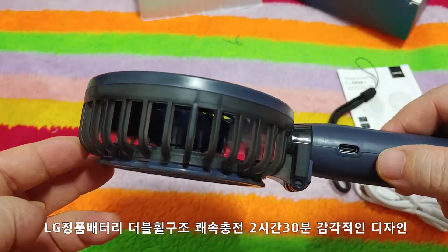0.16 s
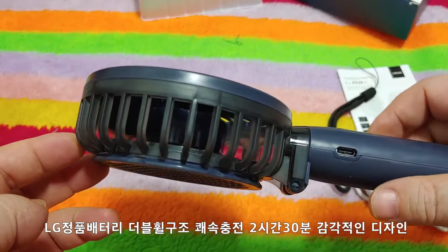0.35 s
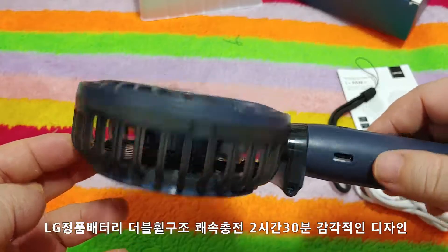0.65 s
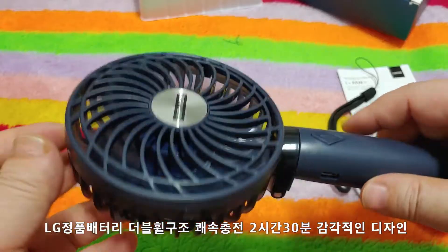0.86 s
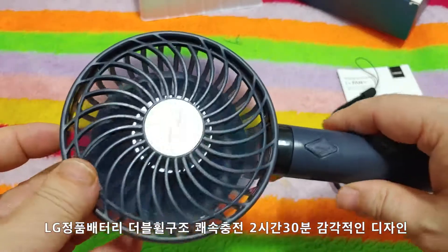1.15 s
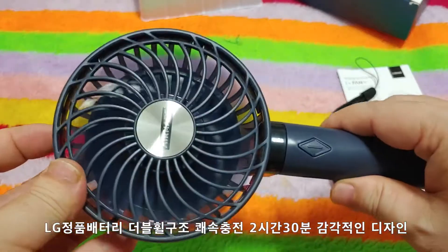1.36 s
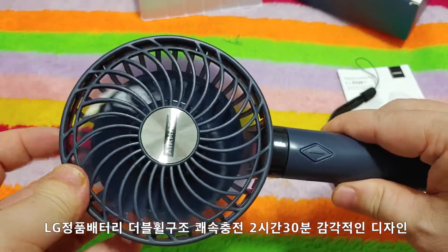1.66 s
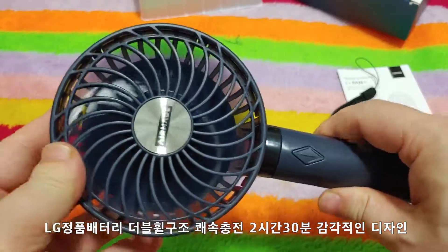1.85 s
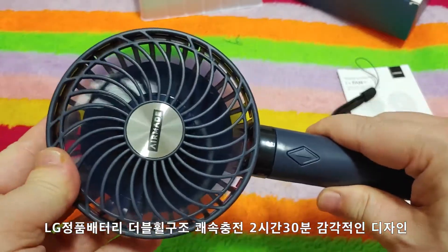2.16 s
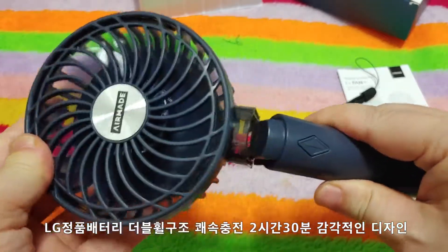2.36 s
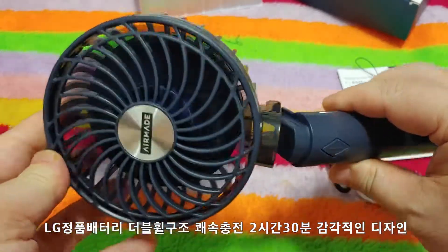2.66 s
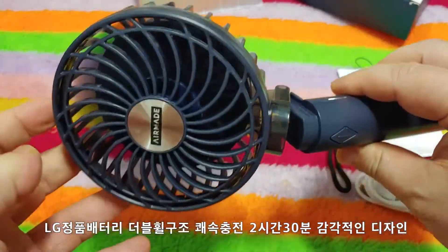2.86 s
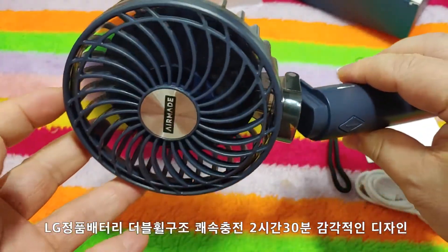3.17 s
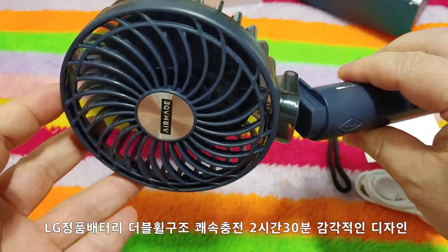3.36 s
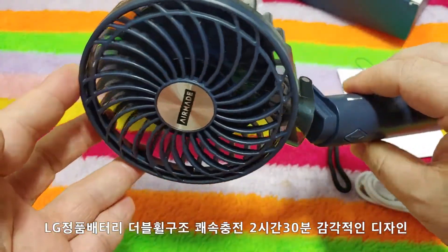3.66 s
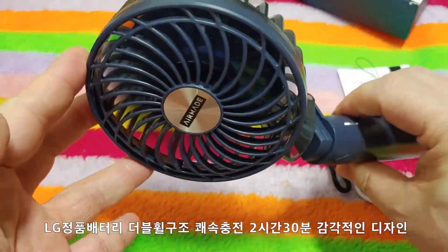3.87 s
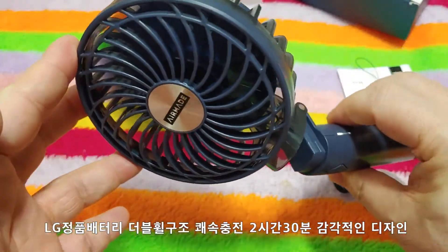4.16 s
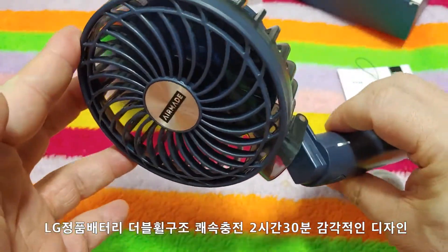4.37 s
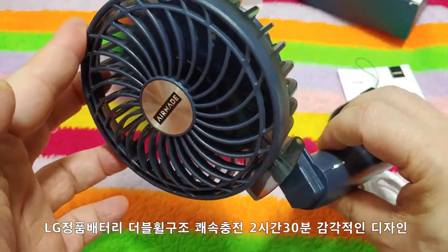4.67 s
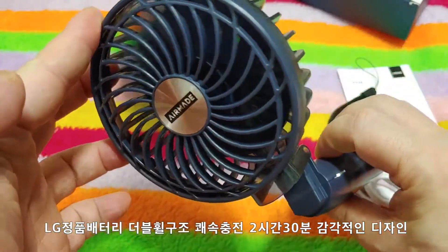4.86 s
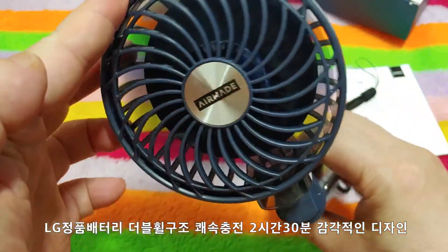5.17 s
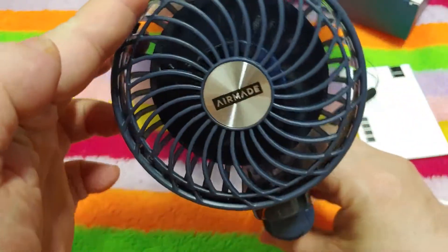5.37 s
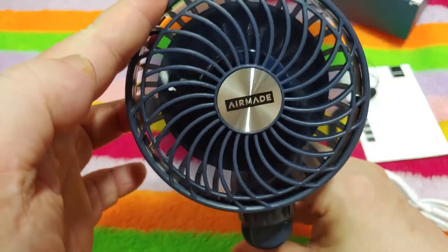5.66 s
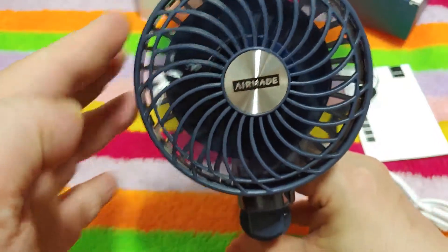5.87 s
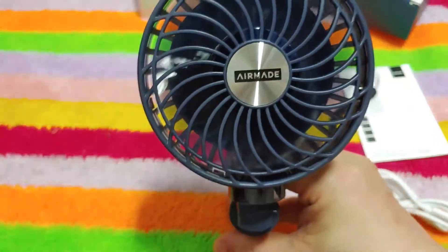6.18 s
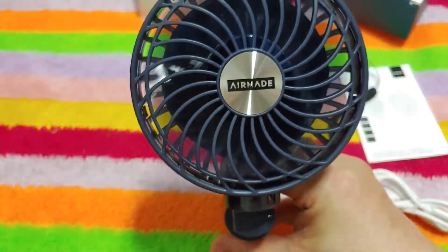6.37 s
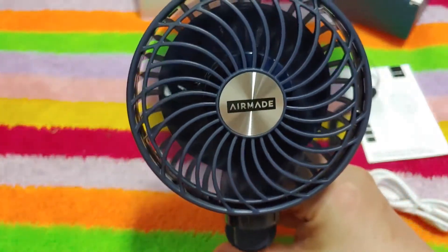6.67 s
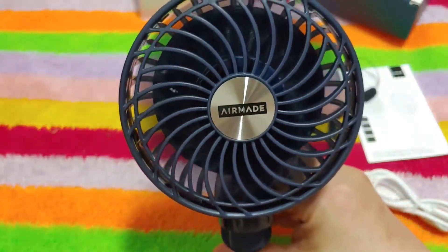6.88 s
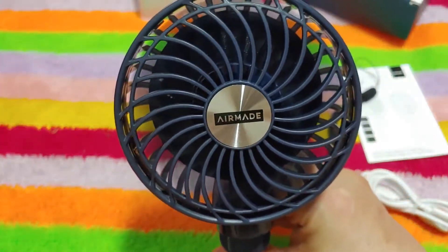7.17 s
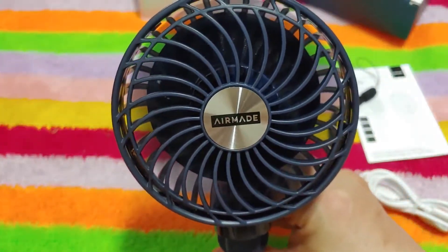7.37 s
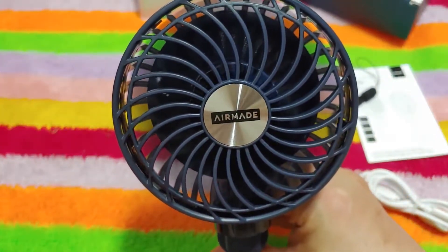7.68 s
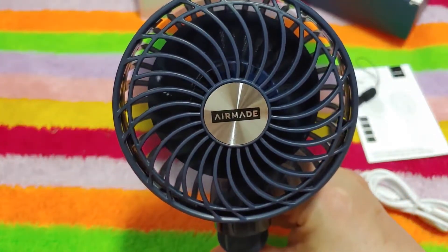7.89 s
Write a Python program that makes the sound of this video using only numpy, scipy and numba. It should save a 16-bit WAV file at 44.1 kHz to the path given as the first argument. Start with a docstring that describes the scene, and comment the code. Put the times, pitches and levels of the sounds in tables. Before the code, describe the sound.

A small handheld fan hums steadily with airy hiss, and twice its jet buffets the microphone in hard, distorted, fluttering gusts, mostly on the left.

```python
"""A small four-bladed battery fan is turned about in the hands just in front of two microphone ports.
Blade tones and a thin motor whine are sines locked to one shaft; air through the grille is coloured noise.
Twice the jet sweeps onto the ports and breaks up into gusts: filtered noise for the eddies and
short swings for the hardest ones. They buffet the left port hard and graze the right one."""
import sys
import numpy as np
from scipy import signal
from scipy.fft import rfft, irfft
from scipy.io import wavfile
from scipy.ndimage import uniform_filter1d, minimum_filter1d, map_coordinates
from numba import njit

SR = 44100
rng = np.random.default_rng(int(sys.argv[2]) if len(sys.argv) > 2 else 0)


def wav_out(sig):
    """Save sig, one row per channel (or a flat mono array), as 16-bit PCM at SR to the path in sys.argv[1]."""
    wavfile.write(sys.argv[1], SR, np.round(np.clip(np.atleast_2d(sig).T, -1, 1) * 32767).astype(np.int16))


N = 354123
TIME = np.arange(N) / SR
FREQS = np.maximum(np.arange(N // 2 + 1) * SR / N, 1)  # Hz, kept above 0 for the logarithm

# air through the grille as the fan is turned: start_s, relative level_db
RUSH_LEVEL = [(0.1, -53), (0.68, -52.5), (0.87, -49), (1.13, -49), (1.22, -51.5), (1.89, -56),
              (3.33, -52.5), (4.85, -50.5), (5.2, -48.5), (5.5, -54.5), (6.2, -58), (7.1, -54),
              (7.95, -51.5)]


def undb(db):
    """Decibels to gain."""
    return 10 ** (np.asarray(db) / 20)


def curves(table):
    """Each column of a table, joined by straight lines in time."""
    s, *columns = np.transpose(table)
    return [np.interp(TIME, s, column) for column in columns]


def unit(x):
    """Scale to a spread of 1."""
    return x / np.std(x)


def smooth(x, seconds):
    """Moving average, taken twice."""
    size = max(int(seconds * SR), 1)
    return uniform_filter1d(uniform_filter1d(x, size), size)


def walk(rate_hz):
    """Slow random wandering of spread 1: noise that fades out above the given rate."""
    spectrum = rfft(rng.standard_normal(N))
    return unit(irfft(spectrum / (1 + (FREQS / rate_hz) ** 4), N))


def colour(x, hz, db):
    """Filter by a spectrum of (Hz, dB) points."""
    gain = undb(np.interp(np.log(FREQS), np.log(hz), db))
    return irfft(rfft(x) * gain, N)


def band(x, low_hz, high_hz, order=2):
    """Keep the pitches between two limits (Butterworth band-pass)."""
    return signal.sosfilt(signal.butter(order, [low_hz, high_hz], "band", fs=SR, output="sos"), x)


@njit
def lowpass(x, hz, damping):
    """State-variable low-pass whose corner moves every sample."""
    y, b, l = np.empty(len(x)), 0., 0.
    for i in range(len(x)):
        g = np.tan(np.pi * hz[i] / SR)
        v = (b + g * (x[i] - l)) / (1 + g * (g + damping))
        y[i] = l + g * v
        b, l = 2 * v - b, 2 * y[i] - l
    return y


def delay(x, lag_s):
    """Read a sound a moving time later."""
    return map_coordinates(x, [(TIME - lag_s) * SR], order=3, mode="mirror")


def tones(lag_s, flutter=0.00087, hum_waver_db=0.5, blade_waver_db=1.5, motor_waver_db=1.5,
          blade_jitter=0.45, motor_jitter=0.23, shading=0.48):
    """Blade and motor tones, all locked to one shaft; uneven inflow makes the overtones waver."""
    # shaft speed before flutter, sagging a little as the grille is covered: start_s, speed_hz (turns per second)
    shaft_speed = [(0.0, 61.67), (0.75, 61.75), (1.8, 61.23), (2.6, 61.24), (3.1, 61.55), (4.2, 61.82),
                   (5.3, 61.67), (6.2, 61.48), (8.0, 61.62)]
    # blade tones beam past the ports as the fan is turned:
    # start_s, left_hum_db, right_hum_db, overtones_db, third_overtone_extra_db
    hum = [(0, -34.5, -41.5, -42.5, 2), (0.4, -34.5, -43, -43.5, -12), (0.7, -35, -42.5, -44, 0),
           (0.92, -31, -32, -39.5, -0.5), (1.12, -29, -30, -40, 2), (1.5, -38, -33, -39, -3),
           (2, -40, -37.5, -45.5, 3), (2.5, -31.5, -36, -48.5, 7.5), (3.1, -35, -32.8, -47, 4),
           (3.9, -33.5, -32.5, -45, -4), (5.25, -29.5, -31.3, -44.5, -1), (5.9, -44, -42.5, -50, -8),
           (6.8, -36.5, -39.5, -51.5, -14), (8, -33.5, -38.5, -49.5, -15)]
    # overtones of the blade rate: multiple, left_db, right_db (both added to overtones_db)
    overtones = [(2, -8.5, -7), (3, -1.5, -5.5), (4, -12.5, -6), (5, -16.5, -14), (6, -19, -13.5),
                 (7, -19, -23.5), (9, -19, -16)]
    # motor tones: multiple of the shaft rate, left_db, right_db (before the shading)
    motor = [(1, -70, -84), (2, -57.5, -64), (28, -72, -63), (30, -66.5, -79), (32, -54, -61),
             (33, -62, -74.5), (52, -73, -74.5), (99, -78.5, -84)]
    # a low motor tone, strongest while the fan is held edge-on: start_s, level_db (before the waver)
    drone = [(0, -57), (0.7, -51.5), (1.4, -77)]
    blades, drone_multiple = 4, 6

    speed_hz = curves(shaft_speed)[0] * (1 + flutter * walk(14.0))
    turns = np.cumsum(speed_hz) / SR
    right_turns = np.interp(TIME - lag_s, TIME, turns)
    angle = 2 * np.pi * np.array([turns, right_turns])

    left_db, right_db, overtone_db, third_db = curves(hum)
    hum_db = np.array([left_db, right_db]) + hum_waver_db * walk(13)
    out = undb(hum_db) * np.sin(blades * angle)
    for multiple, *port_db in overtones:
        db = np.array(port_db)[:, None] + overtone_db + blade_waver_db * walk(26)
        if multiple == 3:
            db += third_db
        phase = rng.uniform(0, 2 * np.pi) + blade_jitter * walk(2.7)  # radians
        out += undb(db) * np.sin(multiple * blades * angle + phase)

    # the whine fades with the rush of air as the fan turns
    rush_db = curves(RUSH_LEVEL)[0]
    facing_db = shading * (rush_db - rush_db.mean())
    for multiple, *port_db in motor:
        db = np.array(port_db)[:, None] + facing_db + motor_waver_db * walk(6.4)
        phase = rng.uniform(0, 2 * np.pi) + motor_jitter * walk(30)
        out += undb(db) * np.sin(multiple * angle + phase)
    drone_db = curves(drone)[0] + motor_waver_db * walk(7.2)
    out += undb(drone_db) * np.sin(drone_multiple * angle)
    return np.sqrt(2) * out, blades * angle[0]  # the root makes the tone levels rms levels


def turned(air):
    """The rush changes colour as the fan goes between edge-on and face-on."""
    # how far the fan is held edge-on, side slots towards the ports: start_s, share (0-1)
    edge_on = [(0.7, 0.77), (1.5, 0.13)]
    # the slots make the rush hollower: pitch_hz, added_db
    edge_on_colour = [(150, -2.5), (350, 3), (600, 3), (900, -2.5), (1400, -2), (2200, -3), (2900, -0.5)]
    # level of the middle of the rush: start_s, added_db
    middle_level = [(1.2, 0.5), (2.8, 1), (4.7, -1), (5.12, 2), (5.7, -1.5), (6.4, -2.5), (8, -1.5)]
    # the band of that middle: foot_hz, shoulder_hz, shoulder_hz, foot_hz
    middle_band = (550, 790, 1090, 1350)

    share = np.clip(curves(edge_on)[0], 0, 1)
    hollow = colour(air, *np.transpose(edge_on_colour))
    air = (1 - share) * air + share * hollow
    middle = colour(air, middle_band, [-30, 0, -1, -30.5])
    return air + (undb(curves(middle_level)[0]) - 1) * middle


def rush(lag_s, blade_angle, level_db=4.0, low_db=0.58, roar_slope=-0.14, chop=0.066, flicker_db=0.68):
    """Turbulence at the grille: one part reaches both ports, the rest comes scattered off hands and table."""
    # colour of that air before it is turned: pitch_hz, left_db and right_db (dB per Hz, relative)
    rush_colour = [(25, -3, -6.5), (64.6, 5.5, 2), (120, 1.5, 3), (170, 7, 7), (303, 9, 11),
                   (500, 7.5, -7.5), (618, 10.5, 6.5), (875, 12, 10.5), (1060, 9, 0.5), (1280, 9.5, 0),
                   (1390, 12, 2.5), (1640, 7, 3.2), (1900, 3.5, 0.5), (2080, 8.5, -3), (2270, 7, 2.5),
                   (2290, 0.5, -1), (2740, 3.5, 1), (3000, 2, -1), (4390, -1.5, -5.5)]
    # the hiss of the air: pitch_hz, left_db and right_db (dB per Hz, relative)
    hiss_colour = [(5320, -11, -13), (6200, -9, -14), (6860, -8.5, -15), (7400, -18.5, -15),
                   (9660, -15, -15.5), (11150, -28, -28)]
    # the hiss swings from port to port as the fan is turned: start_s, left_db, right_db (both added)
    hiss_aim = [(0.4, -2, 0), (1.1, 0, -2), (2.2, 1.5, 0), (5.1, 1, -0.7), (5.9, 1.5, 2.3), (7.8, 1.5, 1.5)]

    rush_db = curves(RUSH_LEVEL)[0]
    facing_db = rush_db - rush_db.mean()
    roar_db = low_db + roar_slope * facing_db  # the low part swings a little less than the rest
    hiss_db = np.array(curves(hiss_aim))

    hz, *port_db = np.transpose(rush_colour + hiss_colour)
    # share of the power that both ports have in common, by pitch
    shared_hz, shared = [200, 700, 2500, 8000], np.array([0.77, 0.96, 0.36, 0.056])
    direct = colour(rng.standard_normal(N), shared_hz, 10 * np.log10(shared))
    ports = []
    for arrival, db in zip([direct, delay(direct, lag_s)], port_db):
        scattered = colour(rng.standard_normal(N), shared_hz, 10 * np.log10(1 - shared))
        ports.append(colour(arrival + scattered, hz, db))
    # the band from 2300 to 4500 Hz sets the reference level
    air = turned(np.array(ports) / np.std(band(ports, 2300, 4500)))

    roar = colour(air, [1500, 2600], [0, -40])
    hiss = colour(air, [3800, 5500], [-40, 0])
    high = air - roar - hiss + hiss * undb(hiss_db)
    # each passing blade chops the high part
    high = high * (1 + chop * np.sin(blade_angle))
    return (roar * undb(roar_db) + high) * undb(rush_db + level_db + flicker_db * walk(14))


def swept(points, onset_db_per_s, fade_db_per_s):
    """dB to add around a sweep: it comes in before its first point and dies away after its last."""
    before_s = np.maximum(points[0][0] - TIME, 0)
    after_s = np.maximum(TIME - points[-1][0], 0)
    return -onset_db_per_s * before_s - fade_db_per_s * after_s


def jet():
    """Sweeps, their draught and the gusts add in power; the stronger ones weigh more in the eddy rate."""
    # the jet lies on the left port, one list for each sweep:
    # start_s, relative level_db, relative eddy_rate_hz
    sweeps = [
        [(1.187, -15, 167), (1.4, -8, 205), (1.53, -10, 230), (1.83, -9.5, 220), (2.0, -13, 224),
         (2.32, -11, 190), (2.41, -32.5, 78.7), (2.68, -31, 74.4)],
        [(5.26, -25.5, 170), (5.63, -20, 177), (5.76, -10, 216), (5.88, -11, 153), (5.94, -14, 181),
         (6.02, -9.5, 230), (6.12, -13.5, 210), (6.25, -10, 227), (6.55, -13.5, 172), (6.63, -20, 127),
         (7.42, -28, 82.6), (8.03, -23, 91.7)],
    ]
    # gusts that swell and pass on the left port:
    # middle_s, half_length_s (before rise and fall), relative level_db, relative eddy_rate_hz
    gusts = [(1.144, 0.023, -36.5, 55), (1.364, 0.015, -11, 143), (1.671, 0.012, -15.5, 303),
             (1.878, 0.016, -2, 286), (2.232, 0.013, -9.5, 120), (2.331, 0.024, -10.5, 324),
             (2.385, 0.008, -19.5, 120), (2.6, 0.014, -10.5, 188), (2.649, 0.013, -8.5, 295),
             (2.695, 0.012, -16, 197), (5.17, 0.045, -42, 50), (5.266, 0.011, -12.5, 278),
             (5.383, 0.049, -12, 265), (5.465, 0.021, -11, 267), (5.498, 0.016, -9.5, 130),
             (5.558, 0.011, -3.5, 222), (5.601, 0.0046, 0, 240), (5.65, 0.0063, -12, 190),
             (5.683, 0.0063, -7.5, 297), (6.555, 0.013, -11, 109), (6.652, 0.003, -12, 159),
             (6.7, 0.025, -16.5, 177), (6.793, 0.025, -13.5, 136), (6.878, 0.012, -19, 120),
             (6.965, 0.018, -15.5, 176), (7.043, 0.023, -16.5, 144), (7.211, 0.0091, -21, 111),
             (7.26, 0.012, -18.5, 126), (7.294, 0.015, -20.5, 132), (7.358, 0.0065, -12.5, 133),
             (7.583, 0.014, -17, 94.6), (7.743, 0.023, -15, 106.5), (7.857, 0.014, -20.5, 110),
             (7.959, 0.0061, -15, 170), (8.022, 0.0074, -19, 101)]
    onset_db_per_s, fade_db_per_s = 1150, 292
    # slow air just before and after a sweep (level and eddy rate are relative too)
    draught_db, draught_hz, draught_db_per_s = -41, 70, 86
    # a gust arrives faster than it leaves: shares of its half length
    gust_rise, gust_fall = 1, 1.09

    flows = []
    for points in sweeps:
        db, hz = curves(points)
        flows.append((undb(db + swept(points, onset_db_per_s, fade_db_per_s)), hz))
        slow_db = draught_db + swept(points, draught_db_per_s, draught_db_per_s)
        flows.append((undb(slow_db), draught_hz))
    for s, half_s, db, hz in gusts:
        width_s = half_s * np.where(TIME < s, gust_rise, gust_fall)
        flows.append((undb(db) * np.exp(-((TIME - s) / width_s) ** 2 / 2), hz))
    power = sum(size ** 2 for size, hz in flows)
    eddy_hz = sum(size ** 2 * hz for size, hz in flows) / power
    return 10 * np.log10(power), eddy_hz


def slaps(cycles, level_db, wake_s, wake, lean=0.36, skew=1.0):
    """A hard eddy swings the membrane to and fro; returns that swing and the brief squall around it."""
    # the hardest single eddies: middle_s, relative peak_db, pitch_hz
    hard_eddies = [(1.181, -10, 230), (1.229, -9, 280), (1.254, -3, 307), (1.305, 3, 233), (1.361, 7, 170),
                   (1.43, 0, 332), (1.462, 5, 396), (1.489, 5, 270), (1.51, -2, 280), (1.523, -1, 330),
                   (1.553, -4, 380), (1.569, -2, 267), (1.632, 2, 260), (1.656, -6, 390), (1.664, 2, 380),
                   (1.693, 1, 340), (1.713, 2, 367), (1.766, 1.5, 330), (1.78, -4, 410), (1.803, -10, 400),
                   (1.837, -1.5, 280), (1.874, 8, 393), (1.89, -0.5, 564), (1.971, -3, 290),
                   (1.984, 8, 312), (2.02, 7, 345), (2.04, -3, 355), (2.061, 0.5, 403), (2.087, -3, 149),
                   (2.112, -2, 402), (2.191, -1, 303), (2.199, 3, 386), (2.276, -0.5, 333), (2.3, 0, 338),
                   (2.314, 9, 220), (2.327, -4, 530), (2.343, -2.5, 640), (2.351, -5, 540),
                   (2.632, -2, 425), (2.646, 1, 630), (5.268, -7, 497), (5.279, -9, 453), (5.318, -1, 288),
                   (5.335, -1.5, 500), (5.358, -1, 425), (5.371, -9, 520), (5.381, 1, 298),
                   (5.397, -4, 467), (5.415, -1.5, 445), (5.422, 5, 320), (5.442, -3, 336), (5.457, 3, 354),
                   (5.466, 6, 340), (5.474, -2, 400), (5.49, -5, 390), (5.544, 4, 368), (5.556, -1, 380),
                   (5.566, 2, 300), (5.604, -3, 380), (5.641, 0, 298), (5.682, 7, 553), (5.691, -2.5, 570),
                   (5.737, -6, 290), (5.747, -1, 290), (5.775, -3, 350), (5.786, -0.5, 374),
                   (5.799, 1, 248), (5.811, -15, 310), (5.905, 1.5, 312), (5.982, -2, 273),
                   (6.002, -9, 340), (6.012, 3.5, 297), (6.021, -10, 450), (6.054, -8, 290),
                   (6.068, 3, 270), (6.079, -8, 330), (6.092, -3, 300), (6.135, 8, 200), (6.182, -5, 328),
                   (6.206, -7, 285), (6.218, 0, 320), (6.236, -8, 330), (6.252, -4, 327), (6.28, -4, 300),
                   (6.307, -1.5, 365), (6.333, 0.5, 330), (6.377, 0.5, 292), (6.424, -3, 325),
                   (6.459, -2, 300), (6.51, -1.5, 302), (6.526, -7, 300), (6.543, 2, 146), (6.685, -5, 364),
                   (6.78, -1.5, 260), (6.789, 7, 106), (6.798, -9.5, 340), (7.04, 1.5, 127),
                   (7.113, -12, 160), (7.286, -6, 260), (7.311, -8, 200), (7.339, -7.5, 230),
                   (7.353, -6, 185), (7.515, -5, 205), (7.586, -16, 160), (7.727, -10.5, 180),
                   (7.938, -6, 198), (7.957, -5.5, 274)]

    swing, squall = np.zeros(N), np.zeros(N)
    for s, peak_db, hz in hard_eddies:
        turn = skew * rng.standard_normal()  # radians
        near = np.abs(TIME - s) < .04
        age = TIME[near] - s
        angle = 2 * np.pi * age * hz
        # a lopsided swing, turned by a random phase
        shape = -np.sin(angle + lean * np.sin(angle) + turn)
        swell = np.exp(-(age * hz / cycles) ** 2 / 2)
        swing[near] += undb(peak_db + level_db) * swell * shape
        squall[near] = np.maximum(squall[near], wake * np.exp(-(age / wake_s) ** 2 / 2))
    return swing, squall


def buffet(level_db, corner_hz, squall, surge_db, surge_octaves, damping,
           unrest=0.96, eddies_hz=55, handful_s=0.043):
    """Eddies are low-passed noise; random surges shift its brightness and its push,
    together on the left port, oppositely on the right."""
    # how a port answers to moving air: pitch_hz, gain_db (before levelling)
    port_answer = [(22, -17), (38, -8), (55, -0.5), (78, 0.5), (115, -1.5), (170, -1), (330, -5), (700, -9),
                   (2000, -8)]

    surge = unrest * walk(eddies_hz) + squall
    corner = np.clip(corner_hz * 2 ** (surge_octaves * surge), 30, 2500)
    push = lowpass(rng.standard_normal(N), corner, damping)
    push = lowpass(push, 1.66 * corner, damping) * undb(surge_db * surge)
    push = colour(push, *np.transpose(port_answer))
    # the strength of the jet sets the power of each handful of eddies
    return push / np.sqrt(smooth(push ** 2, handful_s)) * undb(level_db)


def wind(left_db=1.16, right_db=-4.5, brightness=1.397, edge_hz=135, edge_growth_db=30):
    """The jet hits the left port squarely; the right port feels only its slow edge."""
    # the edge of the jet lies on the right port, one list for each sweep: start_s, relative level_db
    edge_sweeps = [
        [(1.34, -23), (1.65, -24), (2.33, -30)],
        [(5.51, -30.5), (5.72, -23.5), (6.2, -19), (7.7, -32.5), (8.03, -27)],
    ]
    onset_db_per_s, fade_db_per_s = 345, 109

    jet_db, eddy_hz = jet()
    swing, squall = slaps(cycles=0.42, level_db=-3.5, wake_s=0.013, wake=0.5)
    left = buffet(jet_db + left_db, brightness * eddy_hz, squall,
                  surge_db=1.16, surge_octaves=0.16, damping=1.54)

    edges = [curves(points)[0] + swept(points, onset_db_per_s, fade_db_per_s) for points in edge_sweeps]
    edge_db = np.max(edges, axis=0)
    # the corner drops an octave for each edge_growth_db below the strongest moment
    edge_corner = edge_hz * 2 ** ((edge_db - edge_db.max()) / edge_growth_db)
    right = buffet(edge_db + right_db, edge_corner, 0, surge_db=-1.5, surge_octaves=0.3, damping=1.1)
    return np.array([left + swing, right])


def scene():
    """The fan and its jet at the two ports."""
    # path difference to the two ports: start_s, right_later_than_left_ms
    port_lag = [(0, 0.14), (1, 0.11), (2.4, 0.16), (4.6, 0.15), (6.2, 0.082), (8, 0.097)]
    lag_s = curves(port_lag)[0] / 1000
    whine, blade_angle = tones(lag_s)
    return whine + rush(lag_s, blade_angle) + wind()


def record(dry, hold_s=0.0024, top_hz=10900):
    """A look-ahead limiter holds each channel to full scale; then everything above top_hz is cut."""
    size = max(int(hold_s * SR), 2)
    gain = minimum_filter1d(1 / np.maximum(np.abs(dry), 1), 2 * size)
    limited = dry * smooth(gain, hold_s)
    return signal.sosfilt(signal.ellip(8, .2, 70, top_hz, fs=SR, output="sos"), limited)


dry = scene()
out = record(dry)
wav_out(out)
```